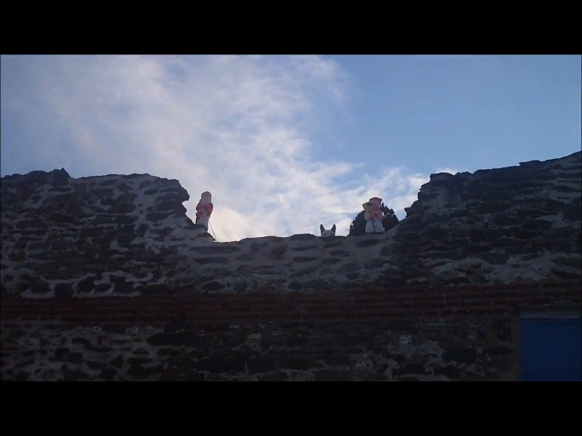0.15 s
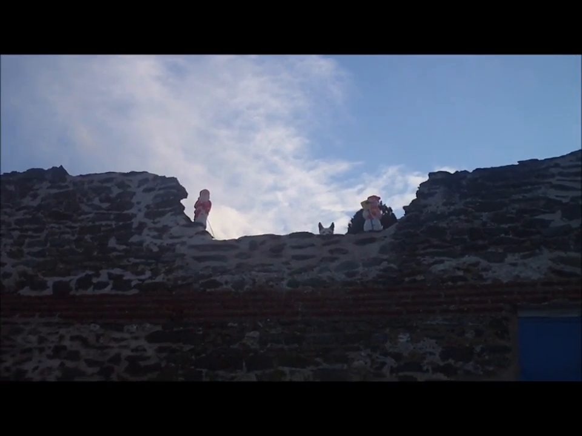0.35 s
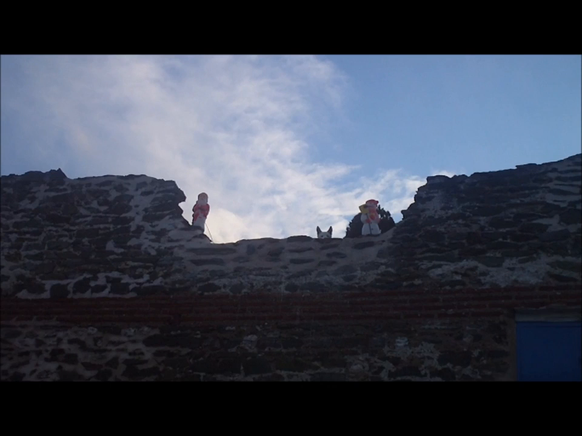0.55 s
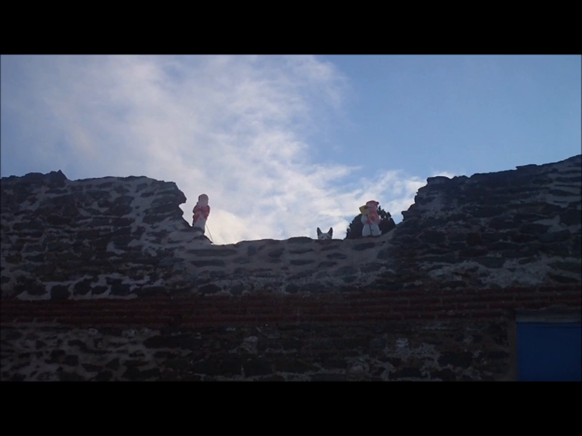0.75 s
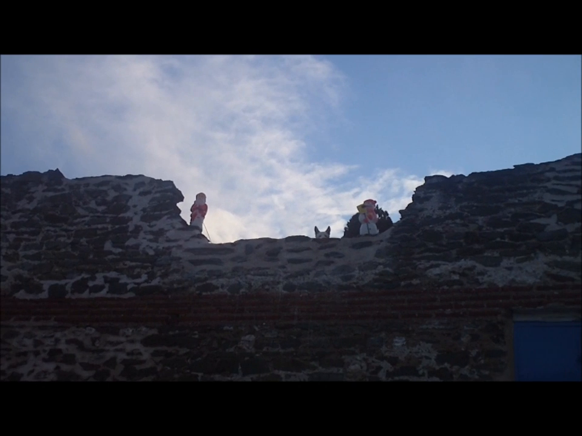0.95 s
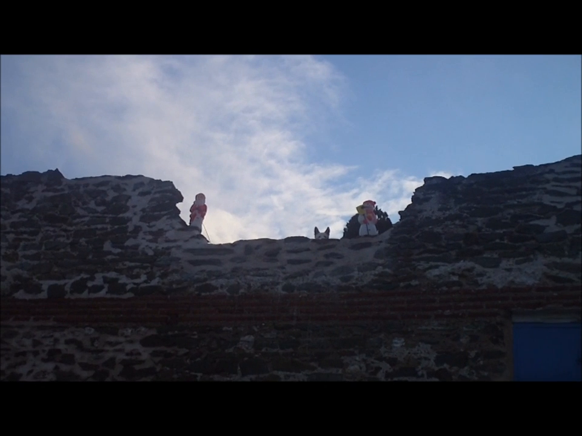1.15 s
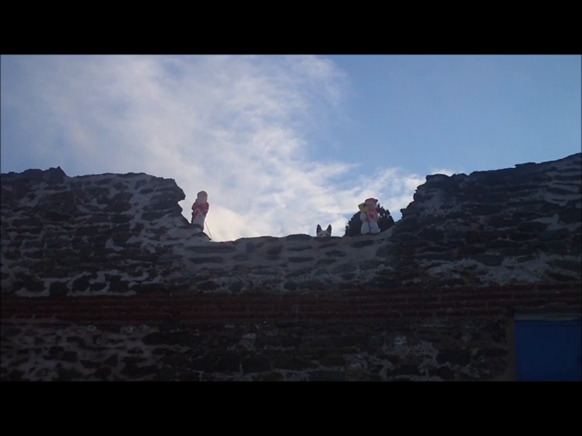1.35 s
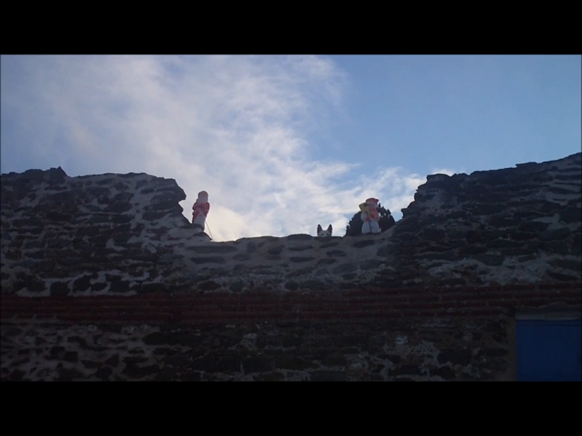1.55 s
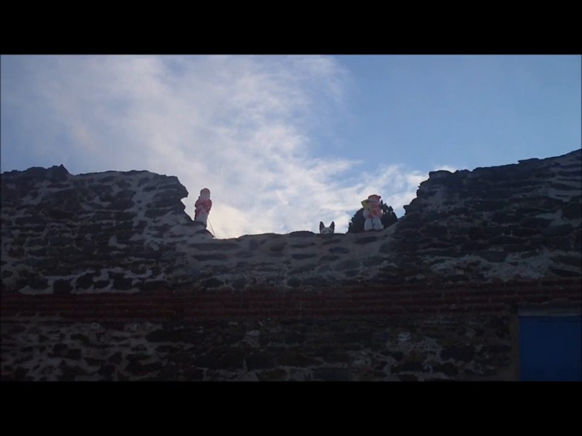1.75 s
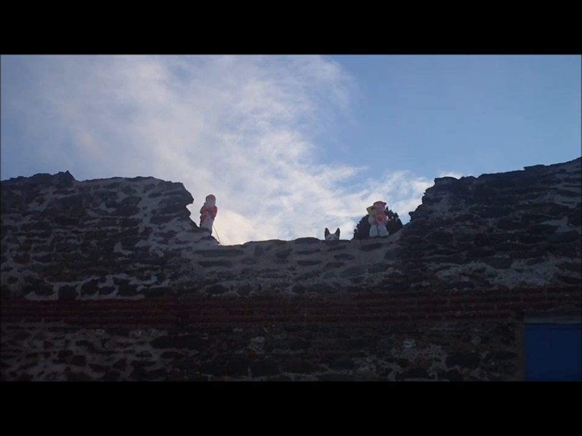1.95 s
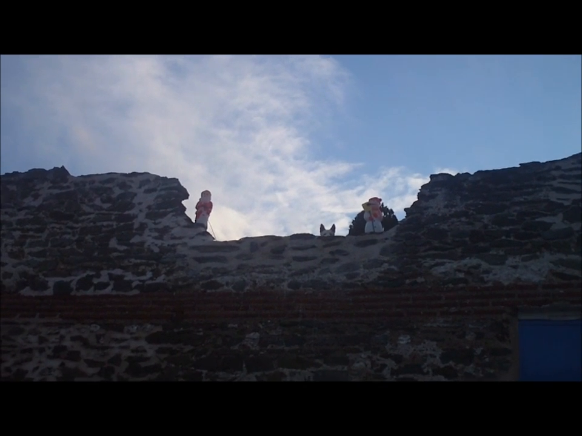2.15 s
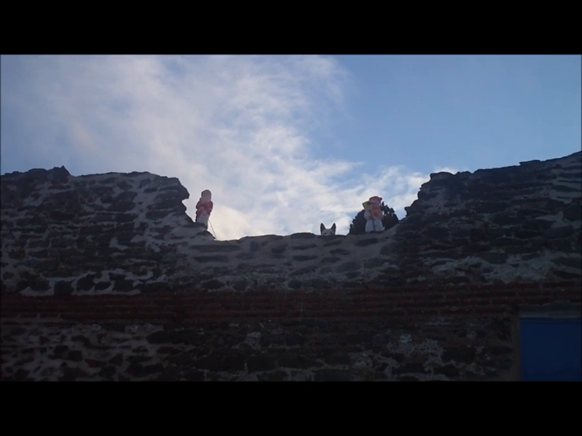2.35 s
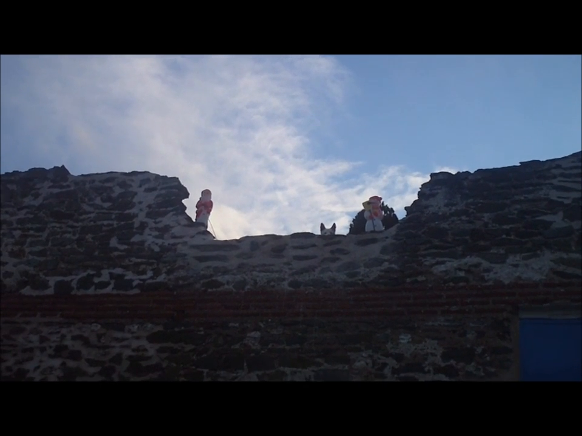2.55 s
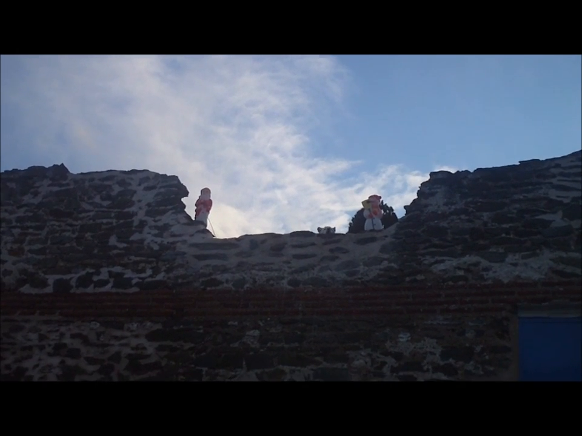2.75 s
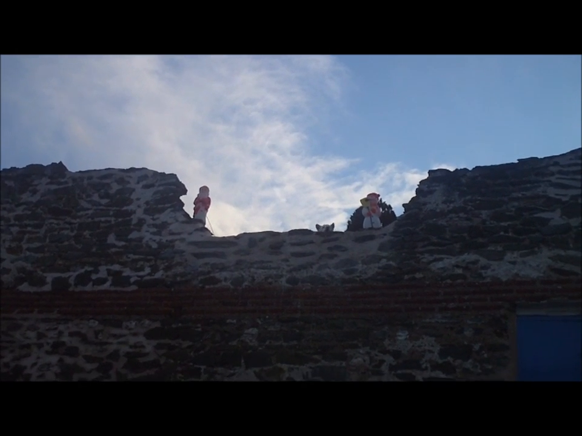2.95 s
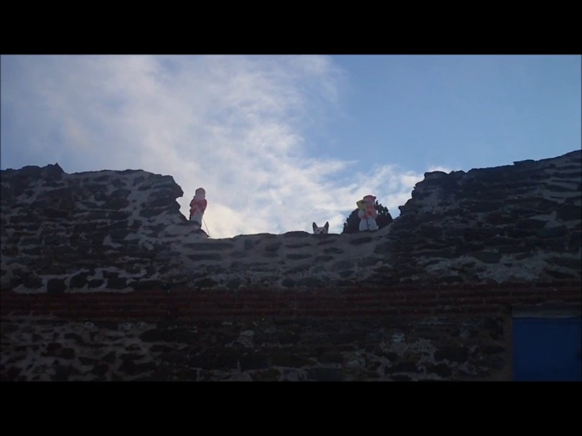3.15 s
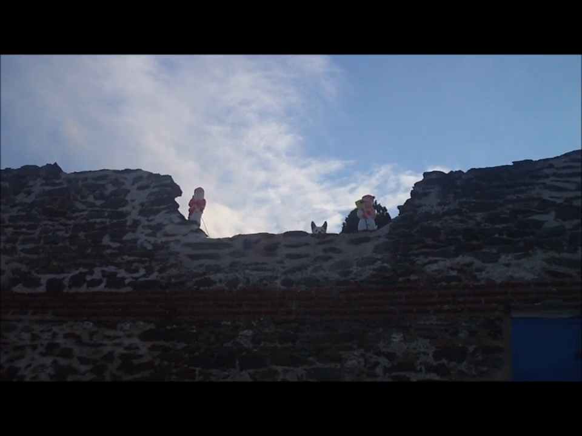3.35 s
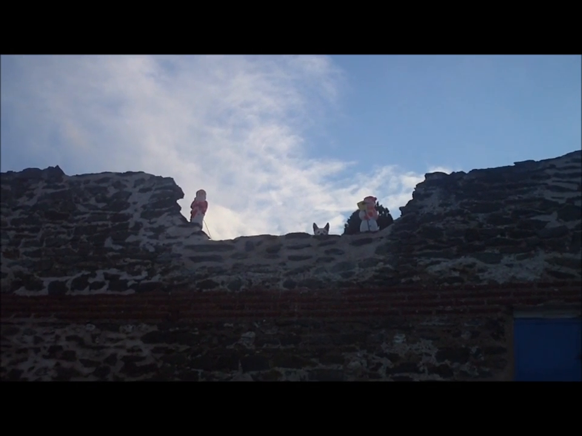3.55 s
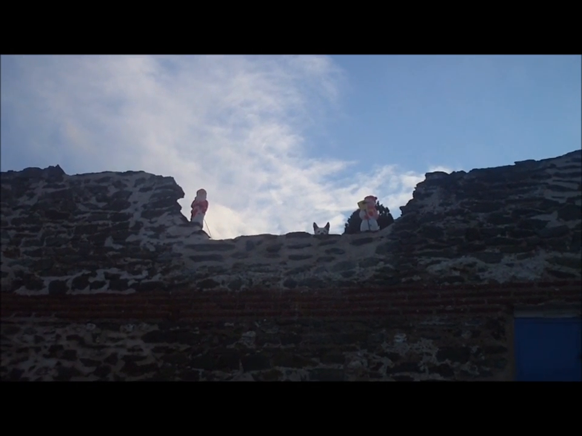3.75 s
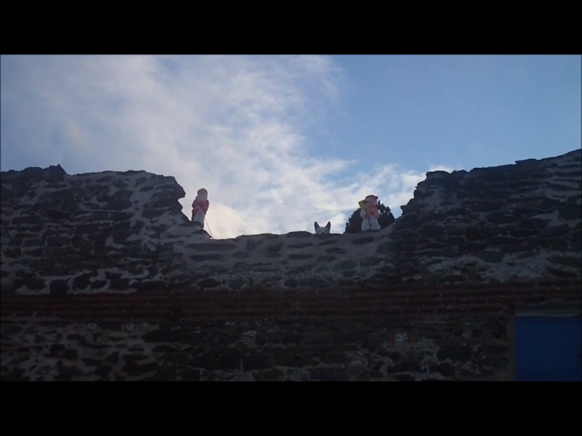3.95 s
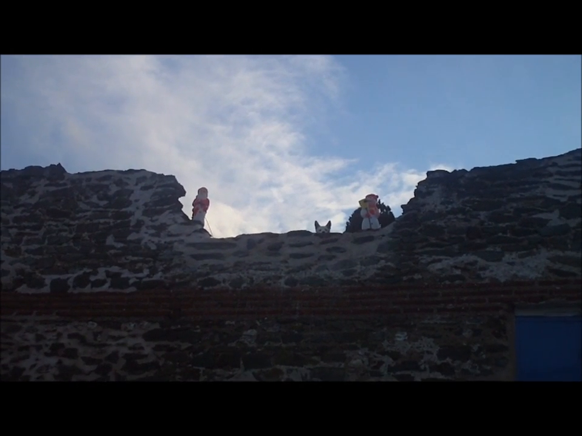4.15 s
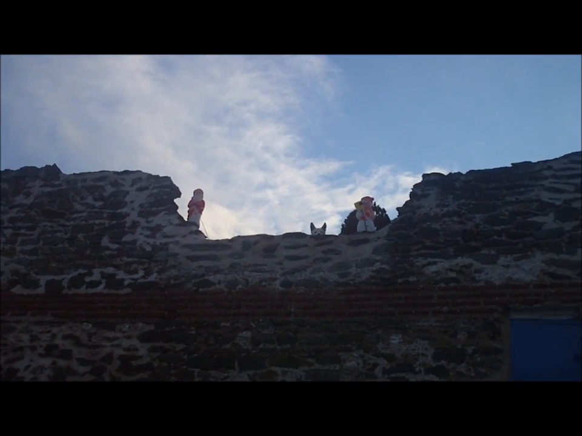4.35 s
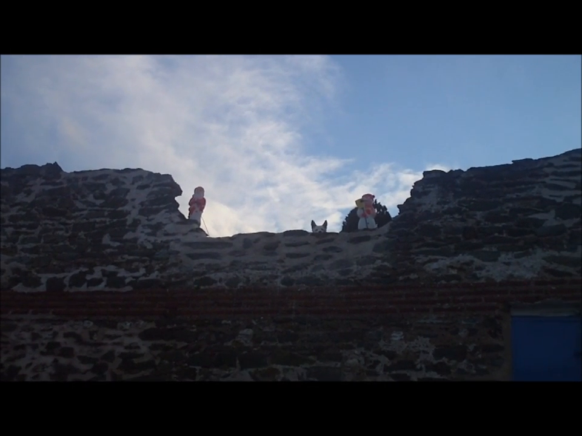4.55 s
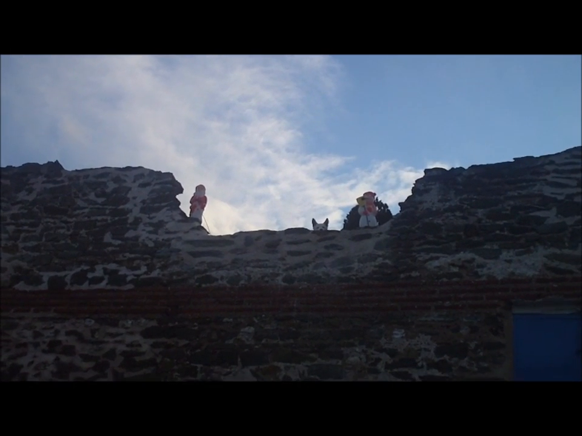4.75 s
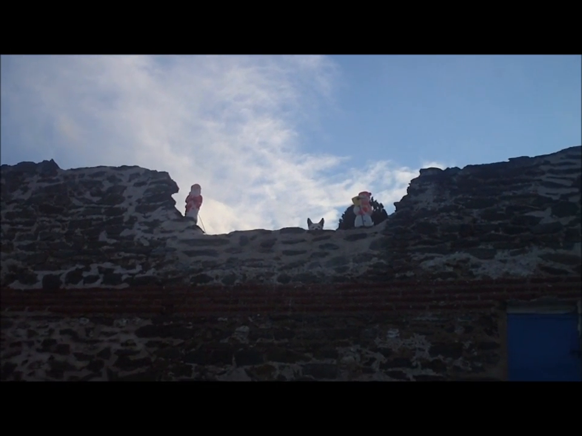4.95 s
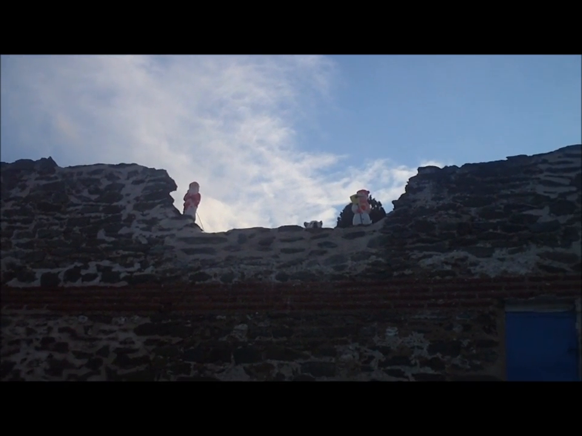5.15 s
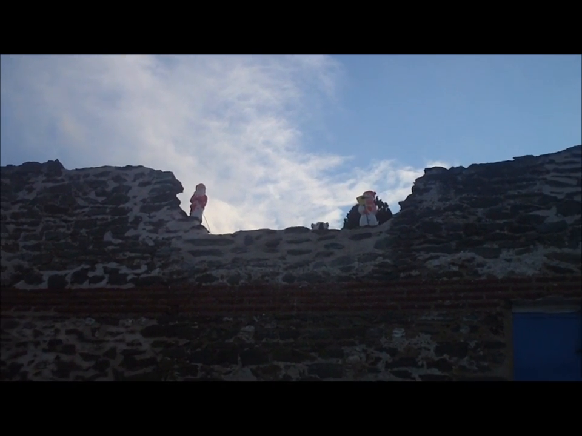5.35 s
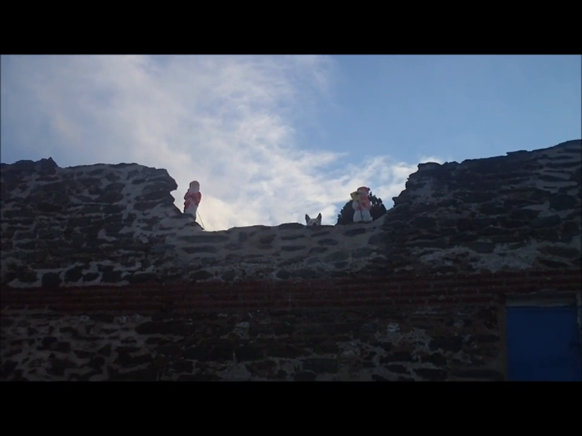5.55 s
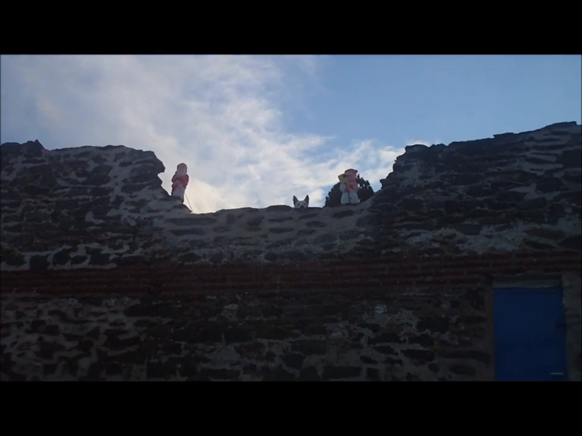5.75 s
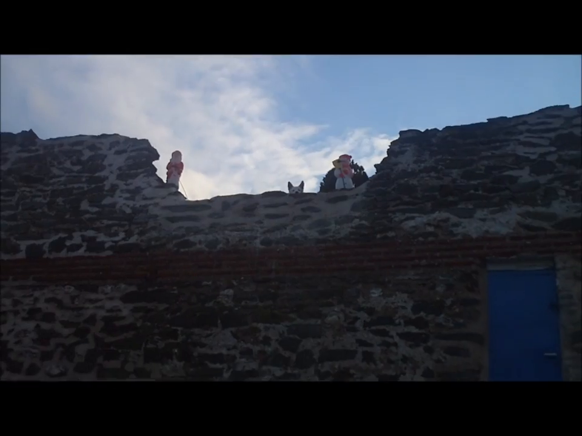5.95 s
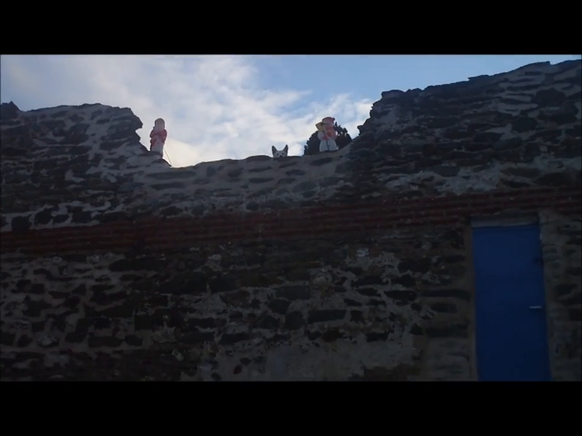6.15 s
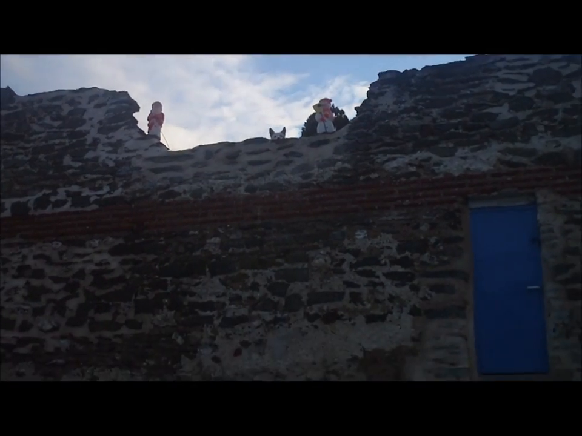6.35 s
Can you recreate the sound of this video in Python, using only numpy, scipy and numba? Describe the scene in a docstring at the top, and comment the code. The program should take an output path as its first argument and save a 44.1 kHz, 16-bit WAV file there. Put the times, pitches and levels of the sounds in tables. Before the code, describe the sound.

Outdoors by stone walls, picked up by a simple handheld microphone with automatic gain: soft rumbling air, small ticks, then one bright meow that closes to a darker vowel. Two explosive hoarse barks come much louder, slightly overloaded, with short wall reflections and a late diffuse echo. After faint high pips, two more barks ring out, then gritty handling rustle and clicks end it.

```python
"""Faint outdoor air and small clicks are heard first: filtered noise, narrow-band drones and decaying bursts.
A cat on a stone wall then gives one long meow, a harmonic series shaped by a moving mouth resonance.
A dog answers with two pairs of gruff barks: chest tone, rough pulses through throat resonances, squeal, yelp.
Walls and, much later, the land return the barks as decaying noise responses. A thin far whistle (sine pips)
and a rustle (grainy noise) are added; a gain control ducks on the loud barks and recovers slowly."""
import sys
import numpy as np
from scipy import signal
from scipy.fft import rfft, irfft
from scipy.io import wavfile
from scipy.ndimage import uniform_filter1d
from numba import njit

SR = 44100
rng = np.random.default_rng(int(sys.argv[2]) if len(sys.argv) > 2 else 0)


def wrap_up_sound(samples):
    """Save the sound to the file named by the first command line argument, as 16-bit audio."""
    columns = np.atleast_2d(samples).T
    # keep every value between -1 and 1, then stretch to whole-number steps
    tamed = np.clip(columns, -1, 1)
    steps = np.round(tamed * 32767).astype(np.int16)
    wavfile.write(sys.argv[1], SR, steps)


N = 286650
T = np.arange(N) / SR  # time axis [s]

# Spectrum of the outdoor air: (frequency [Hz], relative density [dB per Hz])
AIR_SPECTRUM = [(20, -12), (38, -29.5), (56, 1.5), (80, -4.5), (125, -2.5), (210, -4), (335, -6), (400, -5),
                (480, -8), (1350, -11), (1800, -17.5), (3700, -21.5), (4600, -28.5), (9000, -37),
                (11200, -50.5), (13000, -42)]
# Distant drones in the air: (frequency [Hz], width of one filter pass [Hz], mean level [dB])
DRONES = [(57.4, 12, -55), (146.6, 42, -52.5), (384.3, 23, -58)]
# Pips of the far whistle: (time [s], length [s], level [dB])
WHISTLE_PIPS = [(4.185, 0.079, -57), (4.336, 0.085, -48), (4.459, 0.041, -56), (4.596, 0.068, -55),
                (4.739, .04, -59), (4.895, 0.019, -56), (5.019, 0.046, -63)]
# Spectrum of the scuffing: (frequency [Hz], relative density [dB per Hz])
RUSTLE_SPECTRUM = [(200, -4), (550, -3.5), (1000, -4), (1650, 5.5), (2700, -14.5), (3700, -2.5),
                   (5200, -16.5), (6200, -20.5), (9500, -25), (11500, -52), (15000, -40)]
# Scuffs of the rustle: (time [s], length [s], level [dB])
SCUFFS = [(5.95, .25, -52), (6.269, 0.26, -39)]
# Small clicks: (time [s], relative level [dB])
CLICKS = [(0.4794, -50), (0.574, -42.5), (1.095, -41), (1.19, -34.5), (5.9844, -31), (6.2382, -25.5),
          (6.289, -25.5), (6.39, -45), (6.4438, -13.5)]
# Spectrum of the clicks: (frequency [Hz], relative level [dB])
CLICK_SPECTRUM = [(500, -11), (1300, -35), (2500, 15.5), (3000, 1), (4000, 10), (6500, 11.5), (8000, -0.5),
                  (10000, -8), (11500, -30), (15000, -32)]
# Spectrum returned by the reflectors: (frequency [Hz], relative level [dB])
ECHO_SPECTRUM = [(100, -17), (350, -3.5), (455, -6), (500, -3), (600, 5), (710, 2.5), (850, 1.5),
                 (1120, -6), (1300, -3), (1700, -4), (3000, -9), (8000, -51)]
# Near walls and far slopes:
# (delay [s], spread [s], relative level [dB], build-up [dB/s], decay [dB/s])
REFLECTORS = [(.06, 0.027, -3.5, 166.5, 54), (.57, 0.34, -12, 74.5, 29)]
# Pitch of the meow: (time [s], frequency [Hz])
MEOW_PITCH = [(0.845, 509.3), (0.867, 491), (0.885, 554), (0.913, 530.4), (0.945, 557.4), (0.999, 554.3),
              (1.057, 580.7), (1.089, 620.3), (1.151, 648.2), (1.245, 636.7), (1.285, 659.9),
              (1.377, 603.6), (1.391, 604), (1.441, 569), (1.465, 580)]
# The cat's effort, as the level of its fundamental: (time [s], level [dB])
MEOW_EFFORT = [(0.839, -61), (0.851, -40), (.868, -42), (.88, -32.5), (1.1, -30), (1.22, -35),
               (1.29, -30.5), (1.446, -28.5), (1.474, -42.5)]
# Mouth resonance moved by the cat's jaw: (time [s], frequency [Hz])
MEOW_MOUTH = [(.86, 1440), (.91, 1797), (1.0, 1906), (1.06, 1866), (1.13, 1790), (1.23, 1510), (1.29, 1330),
              (1.35, 1015), (1.46, 815)]
# Upper resonances of the cat's open mouth: (frequency [Hz], width scale [Hz], relative level [dB])
CAT_TREBLE = [(2650, 1500, -12), (3520, 180, -25), (4610, 250, -32), (9370, 900, -37.5)]
# Barks: (time [s], top pitch [Hz], upward scoop [Hz/s], chest attack [dB/s], chest hold [s],
# chest level [dB], mouth closes after [s], mouth level [dB], squeal pitch [Hz], squeal level [dB],
# yelp slides after [s], relative yelp level [dB], level sent to the reflectors [dB])
BARKS = [(2.796, 474, 2297, 1054, 0.03, -3, 0.061, -12, 1122, -8, 0.1, -22.5, -14.5),
         (3.008, 486, 899.4, 906, 0.029, -3, 0.053, -10, 1149, -19.5, .087, -20, -16),
         (5.187, 478.5, 2606, 998, 0.022, -3, 0.062, -10, 1152, -7.5, .095, -17, -20.5),
         (5.444, 518, 1490, 747, 0.0025, -2, 0.039, -8.5, 1105, -10.5, .083, -18, -21)]
# Resonances of the dog's throat and muzzle:
# (frequency [Hz], width of one filter pass [Hz], relative level [dB])
MUZZLE = [(475, 250, -3.5), (706.6, 31.5, 3), (893, 67, -1.5), (1103, 154, 1), (1314, 53, 3), (1512, 74, 0),
          (1750, 36, -5), (1963, 81, -12), (2158, 59, -10.5), (2427, 124, -14), (3590, 260, -25),
          (4725, 81, -27.5)]
# Spectrum of the hiss on each bark: (frequency [Hz], relative density [dB per Hz])
TEETH_SPECTRUM = [(4000, -42), (4700, -19), (5150, -12.5), (5550, 7), (6100, -0.5), (7000, 0.5),
                  (7700, 0.5), (8500, -16), (9800, -13), (11200, -39), (13000, -30), (15500, -23.5)]

# Air: level once risen; midpoint, duration and size of its one rise
AIR_DB, AIR_RISE_S, AIR_RISE_LENGTH_S, AIR_RISE_DB = -42, 1.12, 0.44, 4
# The whistle starts a little sharp and settles onto its pitch
WHISTLE_HZ, WHISTLE_OVERSHOOT_HZ, WHISTLE_SETTLE_S = 3310, 37.7, 0.0636
# Meow: time of greatest brightness, overtones over the fundamental, loss towards both ends
BRIGHT_S, BRIGHT_DB, DULLING_DB_PER_S2 = 1.133, 17.5, 157.5
# Bark pitch tops out just after the bark's time, then sags
PITCH_TOP_S, SAG_HZ, SAG_S = 0.019, 46, 0.03
# The voice starts this long before the chest tone is at full strength
VOICE_LEAD_S, CHEST_RELEASE_DB_PER_S = 0.031, 283
# The mouth opens a moment after the chest tone
MOUTH_LAG_S, MOUTH_ATTACK_DB_PER_S, MOUTH_RELEASE_DB_PER_S = 0.022, 485, 476
# Squeal: delay, and half length as a share of the time until the mouth closes
SQUEAL_LAG_S, SQUEAL_SHARE = 0.04025, 0.36
# The yelp slides from a high pitch to a low groan
YELP_HZ, GROAN_HZ, YELP_SLIDE_S = 811, 203.9, 0.01095
YELP_LEAD_S, YELP_HOLD_S, YELP_ATTACK_DB_PER_S, YELP_RELEASE_DB_PER_S = 0.042, 0.041, 391, 755
GROAN_DB, GROAN_HOLD_S = -19, 0.091  # relative to the yelp's level
TOP_HZ = 15350  # upper limit of the pass band


def undb(db):
    """Logarithmic level: decibels to amplitude gain."""
    return 10 ** (np.asarray(db) / 20)


def unit(x):
    """Normalisation to an rms amplitude of 1."""
    return x / np.sqrt(np.mean(x ** 2))


def curve(rows):
    """Linear interpolation of a (time, value) table."""
    s, value = np.transpose(rows)
    return np.interp(T, s, value)


def during(start_s, end_s):
    """Gating: 1 between two times, with edges softened by a moving average."""
    return uniform_filter1d(1. * ((T > start_s) & (T < end_s)), size=300)


def envelope(s, hold_s, attack, release):
    """Exponential growth and decay: reaches 1 at s, holds, falls; slopes in dB per second."""
    db = -attack * np.maximum(s - T, 0) - release * np.maximum(T - s - hold_s, 0)
    return undb(np.maximum(db, -200))


def noise():
    """Gaussian white noise: equal power at all frequencies."""
    return rng.standard_normal(N)


def walk(rate):
    """Low-passed noise: a smooth random fluctuation up to about rate Hz, of rms 1."""
    lowpass = signal.butter(2, min(rate, 5000), fs=SR, output="sos")
    return unit(signal.sosfilt(lowpass, noise()))


def colour(x, points):
    """Minimum-phase filtering: the folded cepstrum gives a causal response with the tabled levels."""
    hz, db = np.transpose(points)
    size = 2 * N
    f = np.maximum(np.arange(N + 1) * SR / size, 1)
    response_db = np.interp(np.log(f), np.log(hz), db)
    cepstrum = irfft(np.log(undb(response_db)))
    cepstrum[1:N] *= 2
    cepstrum[N + 1:] = 0
    return irfft(rfft(x, size) * np.exp(rfft(cepstrum)))[:N]


def ring(x, hz, width):
    """Resonance: one second-order peak with gain 1 at its centre."""
    return signal.lfilter(*signal.iirpeak(hz, hz / width, fs=SR), x)


def ring_twice(x, hz, width):
    """Cascaded resonance: two equal passes steepen the skirts."""
    return ring(ring(x, hz, width), hz, width)


def air():
    """Broadband turbulence: a wash whose low end wavers, over narrow-band drones of varying level."""
    wash = unit(colour(noise(), AIR_SPECTRUM))
    low = signal.sosfilt(signal.butter(2, 450, fs=SR, output="sos"), wash)
    wavering = wash + 0.11 * walk(6.3) * low
    drones = sum(undb(db + 2 * walk(1.8)) * unit(ring_twice(noise(), hz, width))
                 for hz, width, db in DRONES)
    lull = np.clip(.5 - (T - AIR_RISE_S) / AIR_RISE_LENGTH_S, 0, 1)
    return (undb(AIR_DB) * wavering + drones) * undb(-AIR_RISE_DB * lull)


def whistle(edge_db_per_s=400, flutter_db=1, waver=0.0017):
    """Sinusoidal oscillation: a faint, nearly steady far tone gated into pips."""
    since_first = np.maximum(T - WHISTLE_PIPS[0][0], 0)
    hz = WHISTLE_HZ + WHISTLE_OVERSHOOT_HZ * np.exp(-since_first / WHISTLE_SETTLE_S)
    phase = 2 * np.pi * np.cumsum(hz * (1 + waver * walk(39.8))) / SR
    gain = sum(undb(db) * envelope(s, length_s, edge_db_per_s, edge_db_per_s)
               for s, length_s, db in WHISTLE_PIPS)
    return np.sqrt(2) * np.sin(phase) * gain * undb(flutter_db * walk(19))


def rustle(grain_db=4, attack_db_per_s=160, release_db_per_s=90):
    """Frictional noise: random level fluctuations make the close scuffing gritty."""
    grains = noise() * undb(grain_db * walk(740) + 0.602 * walk(17.3))
    pressure = sum(undb(db) * envelope(s, length_s, attack_db_per_s, release_db_per_s)
                   for s, length_s, db in SCUFFS)
    return unit(colour(grains, RUSTLE_SPECTRUM)) * pressure


def clicks(decay_s=0.0019, level_db=-6, tail_db=-24, tail_s=0.025):
    """Transient decay: each noise burst dies within milliseconds and leaves a faint tail."""
    bursts = 0
    for s, db in CLICKS:
        since = np.abs(T - s)
        decay = np.exp(-since / decay_s) + undb(tail_db) * np.exp(-since / tail_s)
        bursts = bursts + undb(db) * decay * (T >= s)
    softened = uniform_filter1d(bursts, size=60)
    return undb(level_db) * softened * unit(colour(noise(), CLICK_SPECTRUM))


def yard(x, t60=0.42, wet_db=-21):
    """Reverberation: convolution with exponentially decaying noise, a short bright ring between walls."""
    response = noise() * undb(-60 * T / t60) * (T > .006)  # t60 [s]: time to fall 60 dB
    return undb(wet_db) * signal.fftconvolve(x, response / np.linalg.norm(response))[:N]


def echoes(x, patchy_db=2, drift_s=0.00061):
    """Scattering: distance-dulled reflections arrive in clumps, and a drifting delay wavers their pitch."""
    response = colour(noise(), ECHO_SPECTRUM)
    fade = sum(undb(db) * envelope(delay_s, spread_s, build, decay)
               for delay_s, spread_s, db, build, decay in REFLECTORS)
    fade = fade * undb(patchy_db * walk(29)) * (T > .012)
    returned = signal.fftconvolve(x, response * fade / np.linalg.norm(fade))[:N]
    return np.interp(T + drift_s * walk(7.44), T, returned)


def cat(width_hz=150, closing_ratio=1.38, jitter=0.0026, rasp_db=-39):
    """Source and filter: harmonics flare as the mouth resonance sinks across the third, then the second."""
    hz, base_db, mouth_hz = curve(MEOW_PITCH), curve(MEOW_EFFORT), curve(MEOW_MOUTH)
    over_db = base_db + BRIGHT_DB - DULLING_DB_PER_S2 * (T - BRIGHT_S) ** 2
    phase = 2 * np.pi * np.cumsum(hz * (1 + jitter * walk(110))) / SR
    k = np.arange(2, 18)[:, None]  # overtone numbers
    resonance = 1 / (1 + ((k * hz - mouth_hz) / width_hz) ** 2)
    mouth = resonance / np.hypot(1, (k * hz / mouth_hz / closing_ratio) ** 12)  # steep loss above it
    opening = np.clip((mouth_hz - 1550) / 400, .35, 1) ** 2  # a wide mouth lets out more treble
    treble = sum(undb(db) / (1 + ((k * hz - f) / w) ** 2 * 2) ** 2 for f, w, db in CAT_TREBLE)
    strength = undb(over_db) * mouth + undb(base_db) * opening * treble
    overtones = (strength * np.sin(k * phase)).sum(0)
    voice = undb(base_db) * np.sin(phase) + overtones * (1 + undb(rasp_db) * walk(540))
    shimmer = 1 + 0.014 * walk(200)
    return np.sqrt(2) * voice * shimmer * during(MEOW_EFFORT[0][0], MEOW_EFFORT[-1][0])


def bark_pitch():
    """Pressure-driven pitch: each bark scoops up to its top and sags as the pressure goes."""
    rows = np.array(BARKS)
    nearest = np.abs(T - rows[:, :1] - PITCH_TOP_S).argmin(axis=0)
    s, top_hz, scoop, *_ = rows[nearest].T
    since_top = T - s - PITCH_TOP_S
    sag = SAG_HZ * (1 - np.exp(-np.maximum(since_top, 0) / SAG_S))
    return np.maximum(top_hz + scoop * np.minimum(since_top, 0) - sag, GROAN_HZ)


def squeal(s, hz, length_s, chest_phase, upper_db=-8, lower_db=-16, rise=1.2, quiver=0.01227):
    """Modulation: the folds break into a rising squeal, which the chest tone chops into side tones."""
    glide = 1 + rise * np.clip(T - s, -.05, .05) + quiver * walk(186)
    phase = 2 * np.pi * np.cumsum(hz * glide) / SR
    upper = undb(upper_db) * np.sin(phase + chest_phase)
    lower = undb(lower_db) * np.sin(phase - chest_phase)
    return np.sqrt(2) * (np.sin(phase) + upper + lower) * np.exp(-((T - s) / length_s) ** 2)


def yelp(s, octave_db=-7, quiver=0.0263, flutter=0.49, slide_db=-3):
    """Falling fold tension: the pitch slides from a yelp down to a faint low groan."""
    remaining = (1 - np.tanh((T - s) / (2 * YELP_SLIDE_S))) / 2
    hz = GROAN_HZ + (YELP_HZ - GROAN_HZ) * remaining
    phase = 2 * np.pi * np.cumsum(hz * (1 + quiver * walk(155))) / SR
    slopes = YELP_ATTACK_DB_PER_S, YELP_RELEASE_DB_PER_S
    slide_gain = undb(slide_db) * envelope(s - YELP_LEAD_S, YELP_HOLD_S, *slopes)
    groan_gain = undb(GROAN_DB) * envelope(s, GROAN_HOLD_S, *slopes)
    tone = np.sin(phase) + undb(octave_db) * np.sin(2 * phase)
    return np.sqrt(2) * tone * (slide_gain + groan_gain) * (1 + flutter * walk(78))


def dog(jitter=0.03, rasp=3.0, half_tone=0.55, teeth_db=-25, flutter=0.24, chest_hiss_db=-36,
        sputter_db=2.6, leak_db=-46.5, break_s=0.0078, break_db=-5, ragged=0.22):
    """Source and filter: a round chest tone, then rough pulses through the muzzle; also the echo feed."""
    phase = 2 * np.pi * np.cumsum(bark_pitch() * (1 + jitter * walk(166.4))) / SR
    uneven = phase + 0.28 * walk(180)
    pulses = unit(sum(np.cos(k * uneven) / k ** .5 for k in range(1, 10)))
    pulses = pulses * (1 + half_tone * np.cos(phase / 2))  # strong and weak cycles alternate
    puffs = 1 + 0.55 * np.cos(phase)  # air escapes once a cycle
    source = pulses + rasp * puffs * noise()
    hiss = unit(colour(puffs * noise() * undb(sputter_db * walk(120)), TEETH_SPECTRUM))

    # double resonances leave dark valleys between the peaks
    mouth = sum(undb(db) * ring_twice(source, hz, width) for hz, width, db in MUZZLE)
    mouth_power = np.abs(uniform_filter1d(mouth ** 2, size=700))
    mouth = mouth / np.sqrt(mouth_power + 1e-12)  # steady pressure behind the rasp
    mouth = mouth + undb(teeth_db) * hiss
    chest = np.sqrt(2) * np.sin(phase) * (1 + flutter * walk(40)) + undb(chest_hiss_db) * hiss
    rattle = walk(87)

    barks, carried = 0, 0
    for (s, _, _, attack, hold_s, chest_db, close_s, mouth_db,
         squeal_hz, squeal_db, yelp_s, yelp_db, echo_db) in BARKS:
        push = undb(chest_db) * envelope(s, hold_s, attack, CHEST_RELEASE_DB_PER_S)
        broken = np.clip((T - s - hold_s) / break_s, 0, 1)  # after its hold the chest tone turns ragged
        push = push * (undb(broken * break_db) + broken * ragged * rattle)
        jaw = undb(mouth_db) * envelope(s + MOUTH_LAG_S, close_s - MOUTH_LAG_S,
                                        MOUTH_ATTACK_DB_PER_S, MOUTH_RELEASE_DB_PER_S)
        # faint hiss starts with the voice and lingers after the mouth closes
        leak = undb(leak_db) * jaw ** 0.26 * hiss
        squealing = squeal(s + SQUEAL_LAG_S, squeal_hz, SQUEAL_SHARE * close_s, phase)
        cry = undb(squeal_db) * squealing + undb(yelp_db) * yelp(s + yelp_s)
        bark = (push * chest + jaw * mouth + leak + cry) * during(s - VOICE_LEAD_S, np.inf)
        barks = barks + bark
        carried = carried + undb(echo_db) * bark
    return barks, carried


def scene(meow_echo_db=-28.5):
    """Superposition: both animals, their reflections and the background add linearly."""
    meow, (barks, carried) = cat(), dog()
    voices = meow + barks
    reflected = yard(voices) + echoes(carried + undb(meow_echo_db) * meow)
    background = air() + whistle() + rustle() + clicks()
    return (voices + reflected + background)[None]


@njit
def follow(x, attack, release):
    """Asymmetric smoothing: rises quickly with its input and sinks slowly."""
    y, e = np.empty(len(x)), 0.
    for i in range(len(x)):
        e += (x[i] - e) * (attack if x[i] > e else release)
        y[i] = e
    return y


def record(dry, threshold_db=-12, attack_s=0.038, release_s=0.6):
    """Gain control: loud sound is ducked and the gain creeps back; peaks clip and the top is cut."""
    power = np.abs(uniform_filter1d(dry[0] ** 2, size=220))
    level_db = 10 * np.log10(power + 1e-12)
    excess_db = np.maximum(level_db - threshold_db, 0)
    duck_db = follow(0.98 * excess_db, 1 / (attack_s * SR), 1 / (release_s * SR))
    out = np.clip(dry * undb(-duck_db), -1, 1)
    return signal.sosfilt(signal.ellip(10, .1, 80, TOP_HZ, fs=SR, output="sos"), out)


dry = scene()
out = record(dry)
wrap_up_sound(out)
```